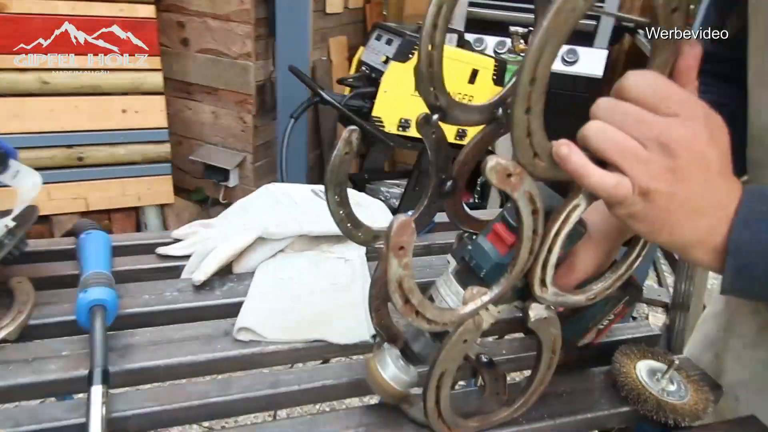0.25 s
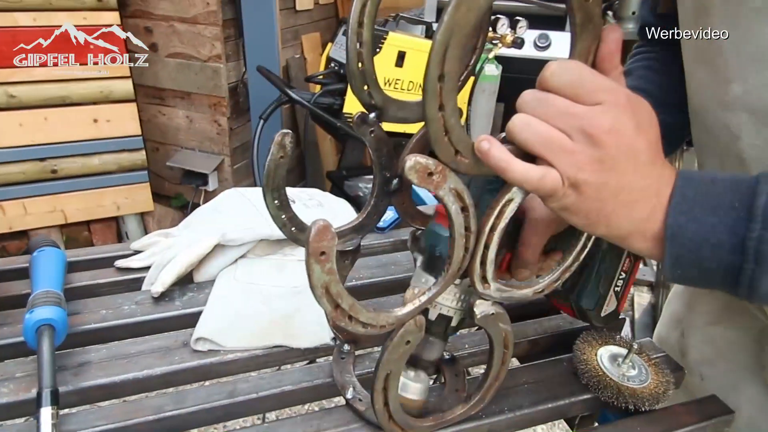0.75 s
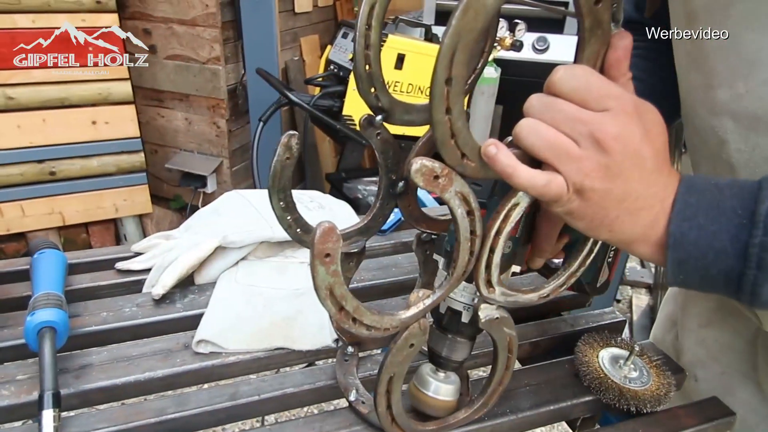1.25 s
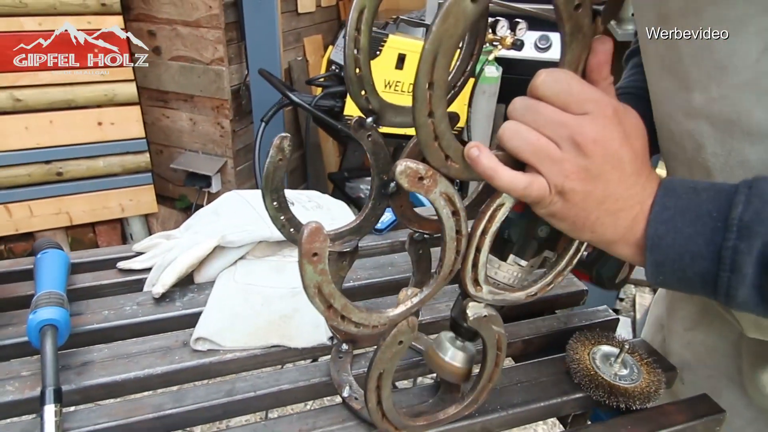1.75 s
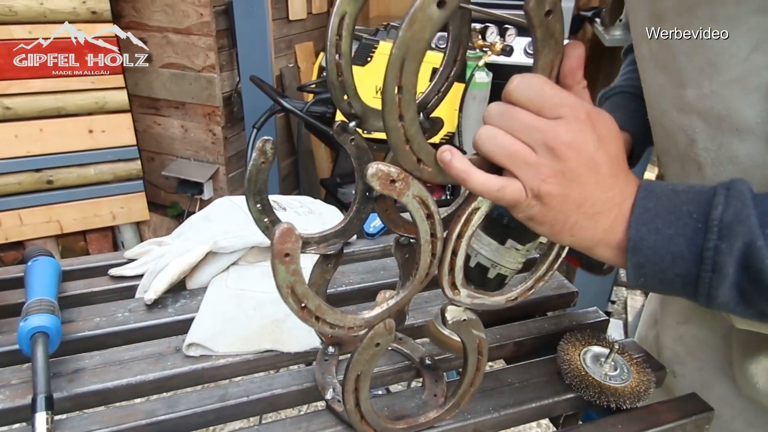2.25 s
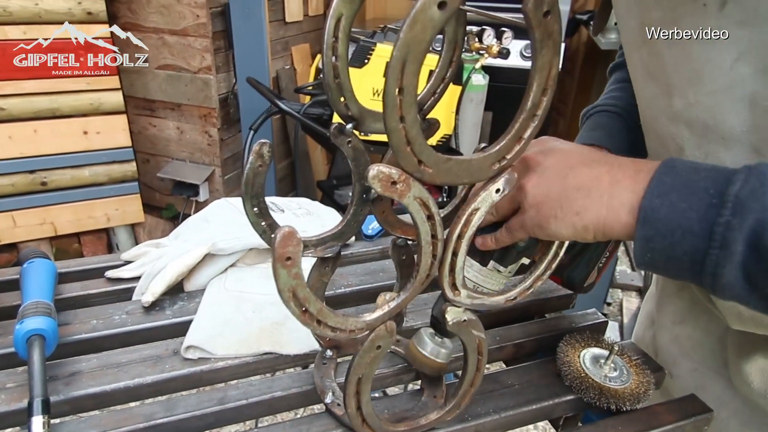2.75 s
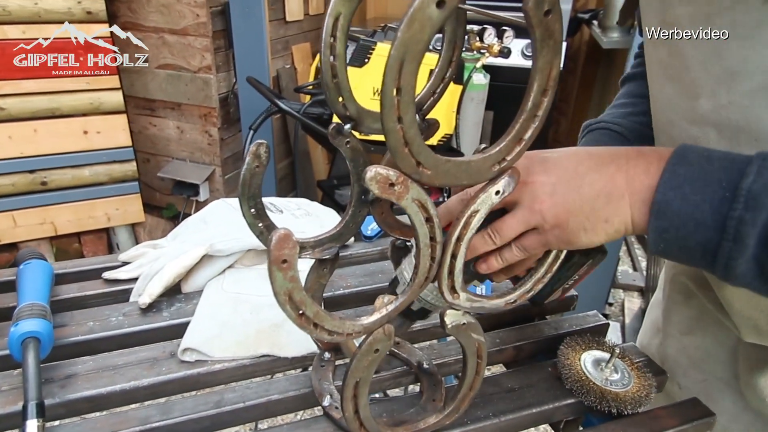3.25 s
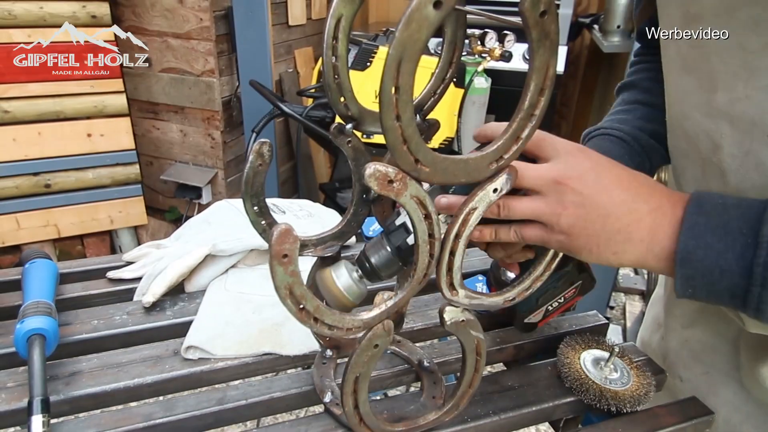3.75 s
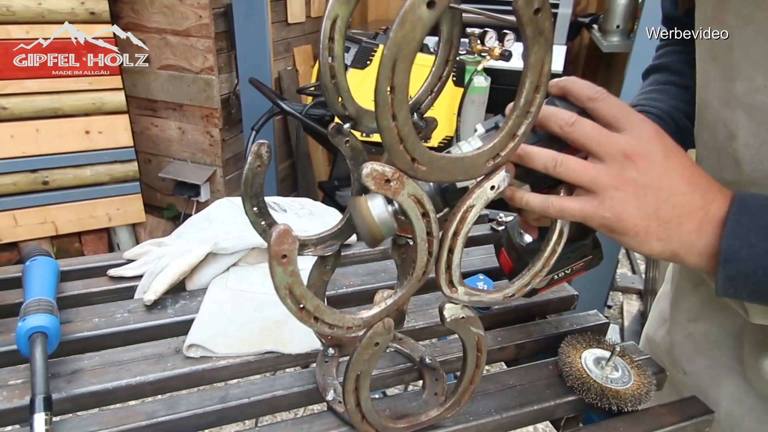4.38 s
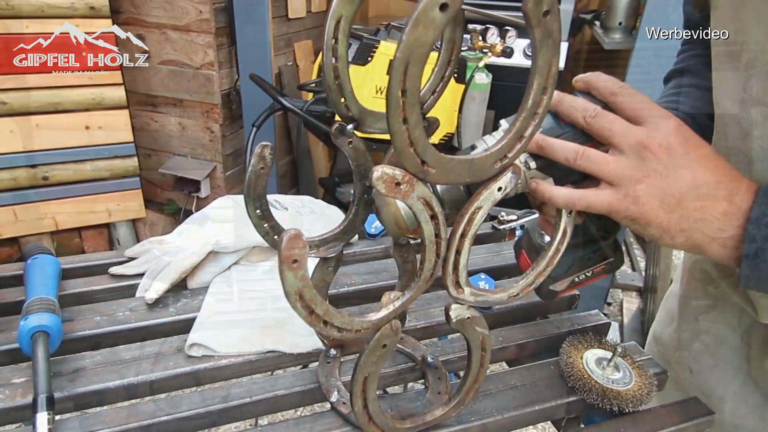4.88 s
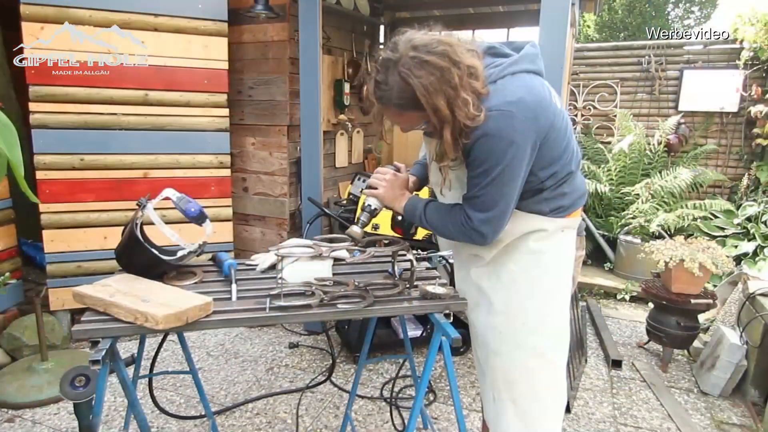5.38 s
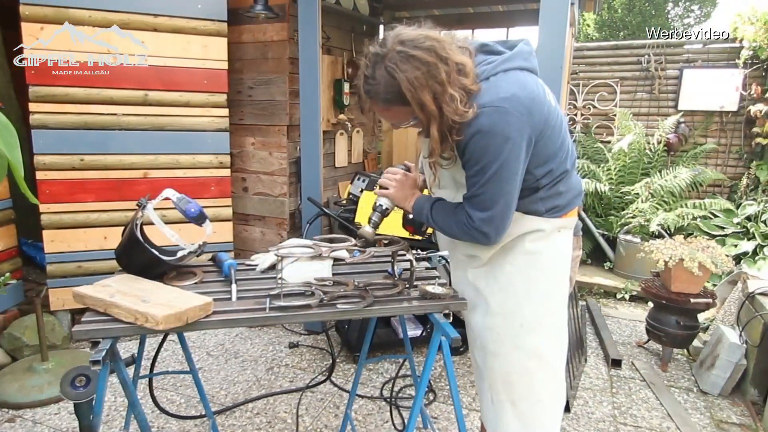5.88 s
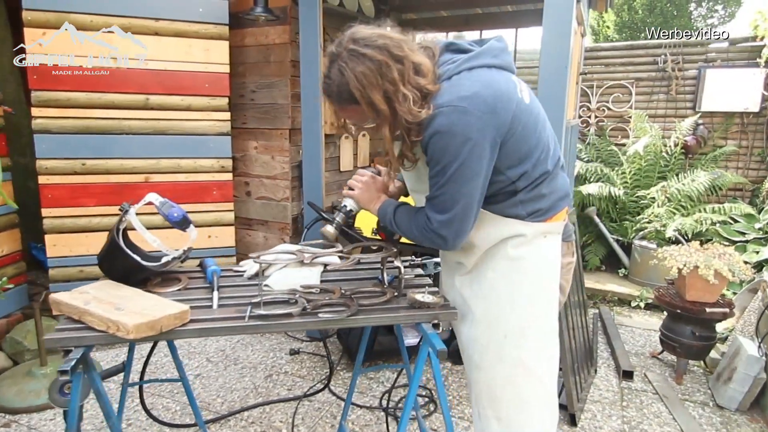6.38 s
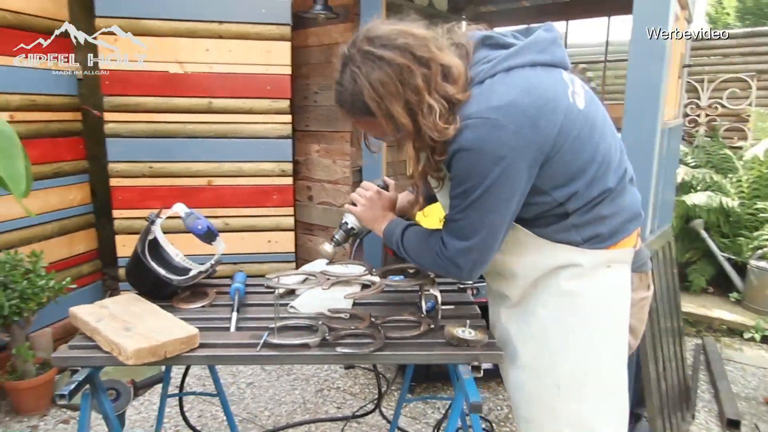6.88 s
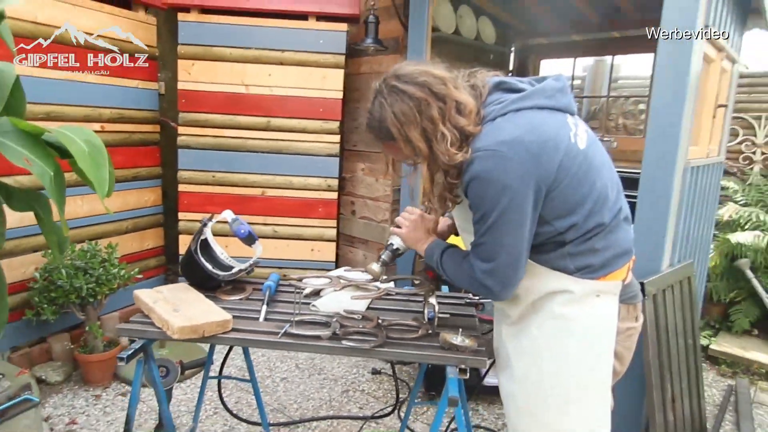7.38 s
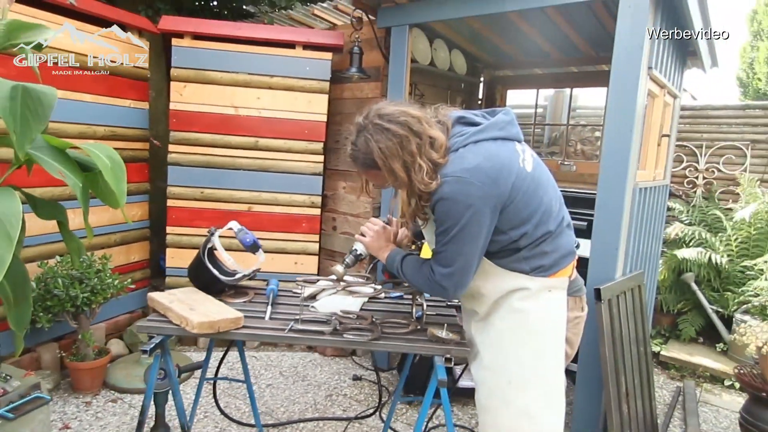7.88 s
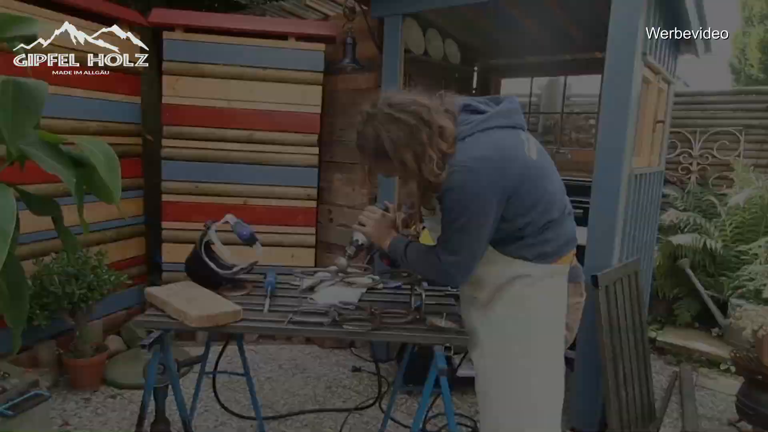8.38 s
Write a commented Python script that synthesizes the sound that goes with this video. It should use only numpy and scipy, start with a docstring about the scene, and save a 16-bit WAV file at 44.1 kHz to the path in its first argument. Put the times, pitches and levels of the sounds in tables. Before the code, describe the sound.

Continuous drill motor whine and gritty gear growl under a dense wire-brush hiss on steel, a few metallic ticks and squeals, fading at the end.

```python
"""Cordless drill with a wire cup brush on welded horseshoes

Outdoors at a steel bench, one microphone, mono: the rotor whines (sines), gears growl in the casing (noise
bands), wires hiss (dense random strikes) and ring thin modes; hum, whistles, far rumble and yard lie beneath.
The steel knocks (decaying tones), scrapes (noise through resonances) and squeals (shaken sines).
The drill is turned, then heard from further off; the sound fades out."""
import sys
import numpy as np
from scipy import signal
from scipy.io import wavfile

SR = 44100
rng = np.random.default_rng(int(sys.argv[2]) if len(sys.argv) > 2 else 0)


def digitize_waveform(pressure):
    """Quantize a signal to 16-bit integers and store it at the path in sys.argv[1].

    Rows of a 2-D input are taken as channels; values are limited to [-1, 1].
    """
    field = np.atleast_2d(pressure).T
    bounded = np.clip(field, -1, 1)
    quanta = np.round(bounded * 32767).astype(np.int16)
    wavfile.write(sys.argv[1], SR, quanta)


N = 380305
STEP = 40  # samples between the points of a slow control


def from_db(db):
    """Gain of a level."""
    return 10 ** (np.asarray(db) / 20)


def rms_one(x):
    """Scale to rms 1."""
    return x / np.sqrt(np.mean(x ** 2) + 1e-20)


def control_times():
    """Times of the slow control points, in seconds."""
    return np.arange(N // STEP + 1) * STEP / SR


def in_time(rows):
    """Columns of a table after its time column, joined by straight lines, at every control point."""
    s, *columns = np.transpose(rows)
    return np.array([np.interp(control_times(), s, column) for column in columns])


def stretch(slow):
    """A slow control, read at every sample."""
    return np.interp(np.arange(N) / STEP, np.arange(len(slow)), slow)


def drift(rate_hz):
    """Slow chance at every control point: noise through a double one-pole low-pass; spread 1."""
    r = np.exp(-2 * np.pi * STEP * rate_hz / SR)
    noise = rng.standard_normal(N // STEP + 2001)
    settled = signal.lfilter([1], [1, -2 * r, r * r], noise)[2000:]
    return rms_one(settled)


def resonate(x, hz, width_hz):
    """One resonance: a pole pair whose radius sets the width."""
    r = np.exp(-np.pi * width_hz / SR)
    return signal.lfilter([1, 0, -1], [1, -2 * r * np.cos(2 * np.pi * hz / SR), r * r], x)


def burst(start_s, length_s, edge_s):
    """Sample span and its on-off shape with soft edges."""
    first, size = round(start_s * SR), round((length_s + edge_s) * SR)
    s = np.arange(size) / SR
    return slice(first, first + size), np.clip(np.minimum(s, s[::-1]) / edge_s, 0, 1)


def ragged(size, depth_db):
    """Uneven grip: the strength heads for a new chance level every 220 samples (5 ms)."""
    knots = rng.normal(0, depth_db, size // 220 + 2)
    return from_db(np.interp(np.arange(size) / 220, np.arange(len(knots)), knots))


def poses():
    """Share of each pose at every control point; each turn fades one pose into the next."""
    # reaching in, pointing down, leaning, held level, far off; changes to the next: (start [s], length [s])
    turns = [(.6, .1), (2.3, .6), (3.65, 0.19), (4.9, 0.29)]
    s = control_times()
    done = [np.clip((s - start) / length, 0, 1) for start, length in turns]
    return -np.diff([np.ones_like(s), *done, np.zeros_like(s)], axis=0)


def coloured(sources, spectra, edges_hz, level_db, shared_db, own_db, own_rate_hz):
    """Narrow bands of two sources in turn, coloured by the pose, flickering together and alone."""
    centres = np.sqrt(edges_hz[1:] * edges_hz[:-1])
    power = []
    for spectrum in spectra:
        hz, db_per_hz = np.transpose(spectrum)
        density_db = np.interp(np.log(centres), np.log(hz), db_per_hz)
        # bands of equal ratio widen with their centre, and so does their power
        power.append(from_db(2 * density_db) * centres)
    power = np.array(power)
    shares = (power / power.sum(axis=1, keepdims=True)).T @ poses()

    together_db = level_db + shared_db * drift(10)
    out = np.zeros(N)
    for k, share in enumerate(shares):
        band_pass = signal.butter(2, edges_hz[k:k + 2], "band", fs=SR, output="sos")
        band = signal.sosfilt(band_pass, sources[k % 2])
        gain = np.sqrt(share) * from_db(together_db + own_db * drift(own_rate_hz))
        out += stretch(gain) * rms_one(band)
    return out


def wire_strikes(per_s, spread_db):
    """Two streams of dense wire strikes of uneven size and either sign, at random moments."""
    sizes = from_db(spread_db * np.minimum(rng.exponential(1, (2, N)), 5))
    signs = rng.choice([-1, 1], (2, N))
    return sizes * signs * (rng.random((2, N)) < per_s / SR)


def rotor():
    """Running angle of the rotor, its pitch wavering slightly, and the levels of its first three multiples."""
    # rotor as heard at the microphone:
    # (time [s], turns [Hz], level of multiple 1 [dB], of multiple 2 [dB], of multiple 3 [dB])
    rotor_course = [(0.0, 409, -60, -47, -49), (0.05, 410.5, -49.5, -48, -49),
                    (0.45, 410.3, -49, -41.5, -46.5), (0.85, 411, -48.5, -48, -49),
                    (1.3, 407, -48.5, -45, -48), (1.5, 404.8, -50, -44, -63), (1.88, 409, -48, -47, -63),
                    (2.05, 408.5, -47.5, -43.5, -49), (2.8, 409.3, -48.5, -41, -44.5),
                    (3.6, 410, -49, -42, -45), (3.76, 409.7, -44.5, -48.5, -44),
                    (4.3, 408.8, -43, -51.5, -43), (4.9, 409.2, -40.5, -50, -44),
                    (5.13, 406.8, -42, -47, -51), (5.25, 407.2, -37, -43.5, -55), (5.8, 407, -37, -43, -62),
                    (6.25, 407, -36.5, -46.5, -62), (6.9, 407, -39.5, -49, -47),
                    (7.25, 408.3, -37.5, -43, -63), (7.9, 406, -37, -46, -50),
                    (8.15, 406.5, -38.5, -45.5, -53)]
    turns_hz, *order_db = in_time(rotor_course)
    angle = 2 * np.pi * np.cumsum(stretch(turns_hz + 0.399 * drift(7.6))) / SR
    return angle, order_db


def whine(angle, order_db):
    """Four multiples of the rotor's turn as sines of wavering strength; the lowest dips briefly."""
    # fourth multiple of the rotor: one level for each pose [dB]
    fourth_db = [-52, -63, -52, -52, -57.5]
    # dip of the lowest multiple: (start [s], length [s], depth [dB])
    dip = (4.375, 0.026, -10.5)
    fourth_waver_db = 3.0
    tones = []
    for k, db in enumerate([*order_db, fourth_db @ poses() + fourth_waver_db * drift(1.6)]):
        gain = from_db(db + 0.52 * drift(15.56) + 0.8 * drift(3.5))
        tones.append(np.sqrt(2) * stretch(gain) * np.sin((k + 1) * angle))
    start, length, depth_db = dip
    span, shape = burst(start, length, edge_s=0.018)
    tones[0][span] *= from_db(depth_db * shape)
    return sum(tones)


def pressure():
    """Brush pressure, given as the level of the wire hiss in dB."""
    # (time [s], level [dB])
    pressure_course = [(0.0, -41.5), (0.5, -39.5), (0.79, -41), (1.7, -40), (1.97, -40.5), (2.2, -39.5),
                       (2.4, -42), (3.09, -40), (3.6, -40.5), (4.08, -38.5), (4.67, -38), (4.97, -42.5),
                       (5.47, -40), (6.17, -39.5), (6.92, -39.5), (7.56, -38), (8.08, -38.5), (8.15, -40)]
    return in_time(pressure_course)[0]


def growl(angle, hiss_db):
    """Gear noise in the casing, swelling a little once in each turn of the rotor."""
    # colour of the casing, one list for each pose: (frequency [Hz], level per Hz, relative [dB])
    growl_colours = [
        [(340, -24), (400, -16), (480, -20), (720, -6.5), (940, -8.5), (1100, -8), (1400, -5), (1890, -1.5),
         (2190, -10.5), (2470, -9), (4000, -21), (4600, -34)],
        [(340, -24), (400, -14), (470, -18), (600, -11.5), (740, -4), (940, -10), (1400, -4), (1570, -6),
         (1880, -3), (2130, -11), (2470, -8.5), (3600, -20.5), (4600, -35)],
        [(340, -26), (400, -17), (470, -22), (600, -15.5), (740, -6.5), (940, -9.5), (1400, -3), (1570, -4.5),
         (1880, -2), (2130, -11.5), (2600, -8.5), (3600, -20.5), (4600, -37)],
        [(340, -22), (400, -14.5), (480, -21.5), (750, -3.5), (930, -11), (1100, -6), (1350, -2.5),
         (1500, -6.5), (1750, -3), (2360, -10), (2950, -6.5), (3610, -20), (4600, -34)],
        [(340, -19), (400, -13.5), (470, -12), (620, -11.5), (750, -5), (910, -5), (1100, -4.5), (1300, -6.5),
         (1690, -8.5), (2470, -10.5), (3750, -21), (4600, -35)],
    ]
    # one level for each pose at mean pressure [dB]
    growl_levels = [-33.5, -35, -34.5, -34.5, -37]
    follows = 0.44  # share of the swing in pressure
    level_db = growl_levels @ poses() + follows * (hiss_db - hiss_db.mean())
    gears = rng.standard_normal((2, N)) * (1 + 0.22 * np.sin(angle))
    return coloured(gears, growl_colours, np.geomspace(340, 4600, num=26), level_db,
                    shared_db=0.52, own_db=1.0, own_rate_hz=3.4)


def hiss(hiss_db):
    """Dense wire strikes on the steel, louder as the brush is pressed."""
    # colour of the hiss, one list for each pose: (frequency [Hz], level per Hz, relative [dB])
    hiss_colours = [
        [(2000, -33), (3400, -6), (3700, -8), (4710, -2), (6600, 1), (7460, -6), (9000, -12), (11700, -43),
         (19800, -120)],
        [(2000, -30), (3400, -1.5), (4890, -1), (5920, -2), (6740, -1), (7960, -6), (8540, -14), (9000, -9),
         (11700, -40), (19800, -120)],
        [(2000, -27), (3400, -0.5), (4170, -3), (4650, -7.5), (5750, 0), (6240, -2), (7550, -2.5),
         (9000, -10.5), (11700, -40), (19800, -120)],
        [(2000, -31), (3400, -3.5), (3830, -8.5), (4670, 0.5), (5320, 2), (7430, -5), (8060, -7.5), (9000, -11),
         (11700, -41), (19800, -120)],
        [(2000, -34), (3400, -8), (3780, -9), (4430, -2.5), (5610, 0), (6310, -3.5), (7460, -3.5),
         (9000, -15.5), (11700, -34), (19800, -120)],
    ]
    strikes = wire_strikes(per_s=14000, spread_db=2.5)
    return coloured(strikes, hiss_colours, np.geomspace(3000, 10000, num=14), hiss_db,
                    shared_db=0.7, own_db=1.0, own_rate_hz=3.6)


def tips(hiss_db):
    """The bright top of the wire tips: strikes of more uneven size, in higher bands."""
    # colour of the tips, one list for each pose: (frequency [Hz], level per Hz, relative [dB])
    tip_colours = [
        [(7000, -13), (8500, -3), (10000, -8), (13000, -7), (15000, -7), (16000, -11)],
        [(7000, -8), (8500, -4.5), (10000, -5), (13000, -5), (15000, -5), (16000, -9)],
        [(7000, -15), (8500, -7), (10000, -6), (13000, -7), (15000, -6), (16000, -11)],
        [(7000, -12), (8500, -7), (10000, -4), (12500, -8), (14000, -5), (16000, -12)],
        [(7000, -3), (8500, -5.5), (10000, -5), (13000, -10), (14500, -10.5), (16000, -18)],
    ]
    # one level for each pose at mean pressure [dB]
    tip_levels = [-49.5, -48.5, -50, -50, -50.5]
    follows = 0.78  # share of the swing in pressure
    level_db = tip_levels @ poses() + follows * (hiss_db - hiss_db.mean())
    strikes = wire_strikes(per_s=14000, spread_db=3.5)
    return coloured(strikes, tip_colours, np.geomspace(7000, 16500, num=10), level_db,
                    shared_db=0.0, own_db=0.8, own_rate_hz=3)


def singing(hiss_db, count=50):
    """Wire strikes ring many thin modes of wires and steel; each lights up as the brush wanders over it."""
    mode_db = -26  # each mode against the wire hiss
    strikes = rng.laplace(size=N)
    out = np.zeros(N)
    for hz in np.geomspace(2100, 14000, count) * rng.uniform(0.97, 1.02, count):
        # above 5 kHz the modes weaken
        fall_db = 7 * np.log2(hz / 5000) ** 2 * (hz > 5000)
        lit = from_db(hiss_db + mode_db + 5 * drift(5) - fall_db)
        out += stretch(lit) * rms_one(resonate(strikes, hz, width_hz=30))
    return out


def rumble():
    """Far rumble: low noise bands whose level slowly rises and falls."""
    # colour of the rumble, one list for each pose: (frequency [Hz], level per Hz, relative [dB])
    rumble_colours = [
        [(20, -15), (42, -3), (75, -6), (100, 3), (130, -8)],
        [(20, -19), (42, -4), (60, -4), (85, -5), (130, -7)],
        [(20, -15), (42, -2), (60, -4), (85, -6), (130, -7)],
        [(20, -14), (45, -2), (75, -5), (100, -5), (130, -8)],
        [(20, -21), (50, 4), (65, -1), (90, -8), (130, -16)],
    ]
    # (time [s], level [dB])
    rumble_course = [(0.0, -54), (1.0, -57.5), (1.72, -62), (2.74, -61), (3.6, -59), (4.9, -64), (5.1, -59),
                     (5.81, -56.5), (6.4, -61), (6.75, -57), (8.15, -56.5)]
    return coloured(rng.standard_normal((2, N)), rumble_colours, np.geomspace(20, 130, num=8),
                    in_time(rumble_course)[0], shared_db=0, own_db=0, own_rate_hz=1)


def yard():
    """Steady noise of the yard and the bench, the same colour in every pose."""
    # (frequency [Hz], level per Hz, relative [dB])
    yard_colour = [(100, -2.5), (150, -3), (200, -3), (250, -3.5), (330, -3), (450, 0.5)]
    yard_db = -57
    return coloured(rng.standard_normal((2, N)), [yard_colour] * len(poses()),
                    np.geomspace(110, 450, num=8), yard_db, shared_db=0, own_db=0, own_rate_hz=1)


def hum():
    """A low tone whose pitch and strength waver."""
    # one level for each pose [dB]
    hum_levels = [-68, -65.5, -68, -66, -61.5]
    pitch_hz, waver_hz = 130.3, 4.0
    angle = 2 * np.pi * np.cumsum(stretch(pitch_hz + waver_hz * drift(3))) / SR
    gain = from_db(hum_levels @ poses() + 2.0 * drift(5))
    return np.sqrt(2) * stretch(gain) * np.sin(angle)


def whistles():
    """Faint whistles of fan and gears: noise twice through each narrow resonance, coming and going."""
    # (frequency [Hz], width of each resonance [Hz], then one level for each of the five poses [dB])
    whistle_table = [(1069, 28, -50.5, -53, -55, -58, -59), (1453, 25, -53, -54, -51, -64, -55.5),
                     (2445, 42, -56, -55.5, -57, -64, -66), (5480, 30, -72, -65, -68, -64, -57),
                     (7350, 25, -75, -75, -75, -70, -64), (7750, 60, -68, -59.5, -60, -59, -69),
                     (8900, 20, -80, -80, -78, -85, -74), (11285, 12, -82, -83, -80, -81, -76),
                     (12210, 15, -80, -84, -78, -81, -74), (12350, 15, -80, -85, -80, -80, -72)]
    pose, noise = poses(), rng.standard_normal(N)
    out = np.zeros(N)
    for hz, width_hz, *levels_db in whistle_table:
        tone = resonate(resonate(noise, hz, width_hz), hz, width_hz)
        gain = (from_db(levels_db) @ pose) * from_db(2.0 * drift(2.5))
        out += stretch(gain) * rms_one(tone)
    return out


def knocks():
    """The work knocks on the bench: a decaying tone, with a noise rattle around its pitch."""
    # (time [s], level before decay and onset [dB], pitch [Hz], time to fall by 60 dB [s])
    knock_table = [(.01, -36, 330, .08), (0.179, -40.5, 100, 0.3), (.26, -39, 280, 0.09),
                   (.57, -41, 100, .15), (.87, -39, 220.4, 0.079), (1.992, -27, 1136, 0.06),
                   (2.07, -43, 250, 0.088), (2.37, -41, 240, 0.08)]
    rattle_width, rattle_db = 0.7, -3  # width as share of the pitch; rattle rms against the tone's peak
    out = np.zeros(N)
    for start, peak_db, hz, t60 in knock_table:
        s = np.arange(round(t60 * SR)) / SR
        first = round(start * SR)
        tone = np.sin(2 * np.pi * hz * s)
        rattle = rms_one(resonate(rng.standard_normal(len(s)), hz, rattle_width * hz))
        onset = 1 - np.exp(-s * hz)
        decay = from_db(peak_db - 60 * s / t60)
        out[first:first + len(s)] += decay * onset * (tone + from_db(rattle_db) * rattle)
    return out


def scrapes():
    """Steel slips on steel: ragged noise rings the modes of the work and rasps around one centre."""
    # (start [s], length [s], level of the ringing part [dB], centre [Hz])
    scrape_table = [(0.584, 0.055, -45.5, 10000), (.735, .015, -53, 12000), (1.773, .04, -45, 8900),
                    (1.808, .008, -37, 6000), (1.989, .006, -44, 7000), (2.004, .03, -49, 4500),
                    (2.018, 0.0097, -53, 13500), (2.067, 0.013, -39, 3600), (2.125, .008, -41, 4500),
                    (2.14, 0.014, -39.5, 3960), (2.209, .018, -46, 10000), (2.522, .008, -43, 8000),
                    (2.535, .025, -52, 10500), (3.13, .05, -51, 11000), (3.565, .03, -46, 8990),
                    (4.019, .025, -53, 11000), (4.11, .025, -55, 11000)]
    # modes of the welded steel: (frequency [Hz], width [Hz])
    steel_modes = [(3300, 120), (3700, 120), (4150, 120), (4600, 120), (5125, 120), (5800, 150),
                   (6220, 120), (6804, 120), (7780, 150), (8310, 150), (9000, 150), (9400, 150),
                   (10250, 150), (11070, 150), (11650, 150), (12640, 150), (13500, 200), (14200, 200),
                   (15100, 200)]
    out = np.zeros(N)
    for start, length, level_db, centre_hz in scrape_table:
        span, shape = burst(start, length, edge_s=0.0045)
        slips = rng.laplace(size=len(shape)) * ragged(len(shape), depth_db=1.0)
        rings = np.zeros(len(shape))
        # modes near the centre of the scrape ring most, each with a strength of its own
        for own_db, (hz, width_hz) in zip(rng.normal(0, 2.5, len(steel_modes)), steel_modes):
            mode_gain = from_db(own_db - 15.0 * np.log2(hz / centre_hz) ** 2)
            rings += mode_gain * rms_one(resonate(slips, hz, width_hz))
        rasp = resonate(slips, centre_hz, 0.36 * centre_hz)
        out[span] += from_db(level_db) * shape * (rms_one(rings) + 0.74 * rms_one(rasp))
    return out


def squeals():
    """One mode of the steel is driven to a squeal: stick-slip holds the pitch but shakes the strength."""
    # (start [s], length [s], pitch [Hz], peak level of the steady tone [dB])
    squeal_table = [(0.59, 0.052, 6750, -37.5), (.59, .055, 9100, -56), (.585, 0.067, 10300, -50),
                    (0.592, .055, 11195, -46.5), (0.593, .055, 12640, -52), (.61, .035, 13500, -61),
                    (1.775, 0.041, 6200, -41), (1.775, .045, 9100, -48), (1.775, .04, 10310, -60),
                    (1.772, .04, 11070, -46), (1.4, .05, 7780, -48), (2.0, 0.045, 5125, -44),
                    (2.206, .025, 10180, -44), (2.21, .02, 11030, -54), (2.53, .03, 10250, -48),
                    (3.0, .03, 7800, -47), (3.565, .03, 6720, -44.5), (3.56, .05, 8350, -53),
                    (3.56, .05, 11650, -60), (3.88, .27, 11900, -56), (4.099, .06, 11640, -59),
                    (5.11, .17, 11690, -61), (5.87, .23, 11285, -55), (6.5, .1, 9920, -56),
                    (6.529, .17, 11340, -59), (7.451, .07, 8860, -54), (7.661, .16, 12390, -64)]
    out = np.zeros(N)
    for start, length, hz, level_db in squeal_table:
        span, shape = burst(start, length, edge_s=0.004 + 0.18 * length)
        shake = resonate(rng.standard_normal(len(shape)), hz, width_hz=60)
        steady = np.sin(2 * np.pi * (hz * np.arange(len(shape)) / SR + rng.random()))
        tone = steady + 0.74 * rms_one(shake)
        out[span] += from_db(level_db) * shape * ragged(len(shape), depth_db=0.5) * tone
    return out


def scene():
    """Drill, brush, steel and yard, the same in both channels."""
    angle, order_db = rotor()
    hiss_db = pressure()
    drill = whine(angle, order_db) + growl(angle, hiss_db) + hum() + whistles()
    brush = hiss(hiss_db) + tips(hiss_db) + singing(hiss_db)
    surroundings = rumble() + yard()
    steel = knocks() + scrapes() + squeals()
    return np.tile(drill + brush + surroundings + steel, (2, 1))


def record(dry):
    """The level is faded out at the end, then a steep low-pass cuts the top."""
    fade_start_s, fade_end_s, fade_power = 8.2, 8.568, 1.1
    cutoff_hz = 15730
    left = (fade_end_s - np.arange(N) / SR) / (fade_end_s - fade_start_s)
    faded = dry * np.clip(left, 0, 1) ** fade_power
    # order 14, 0.5 dB ripple, 70 dB down above the cut
    low_pass = signal.ellip(14, 0.5, 70, cutoff_hz, fs=SR, output="sos")
    return signal.sosfilt(low_pass, faded)


dry = scene()
out = record(dry)
digitize_waveform(out)
```